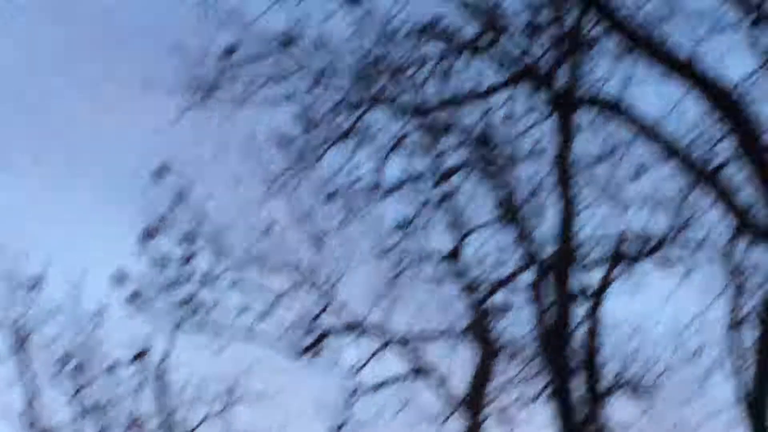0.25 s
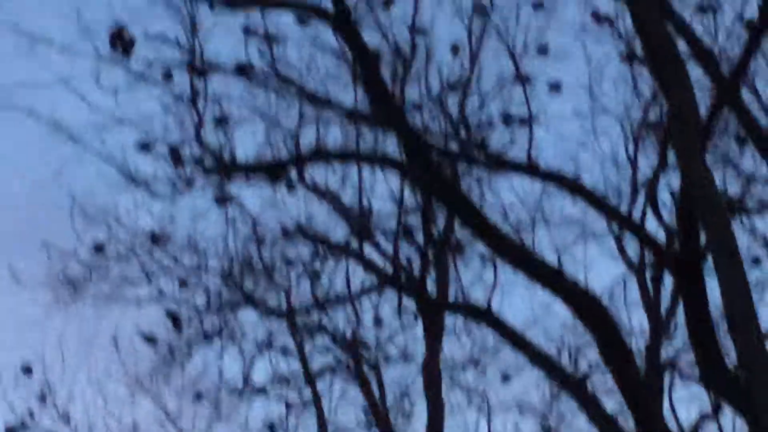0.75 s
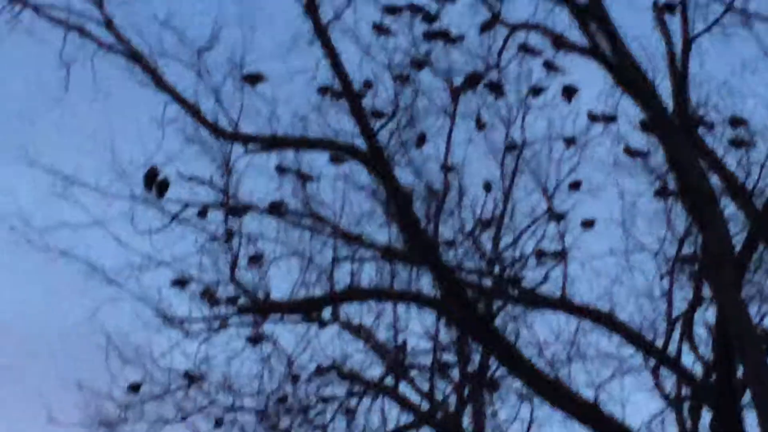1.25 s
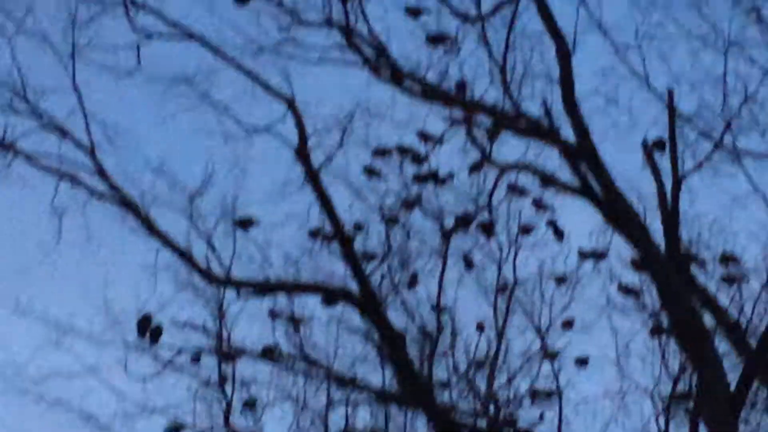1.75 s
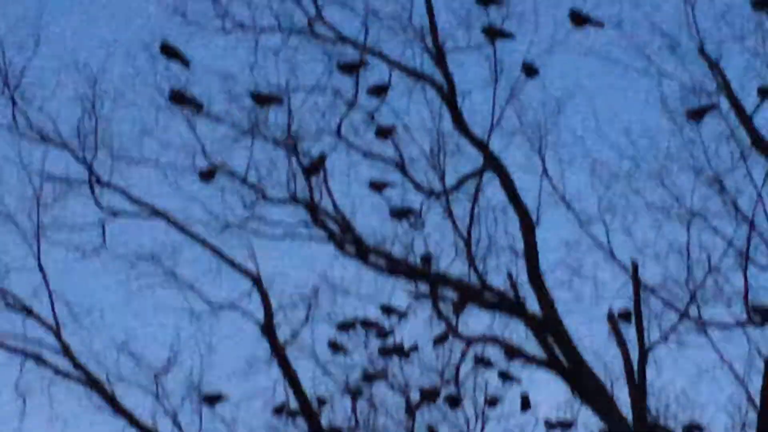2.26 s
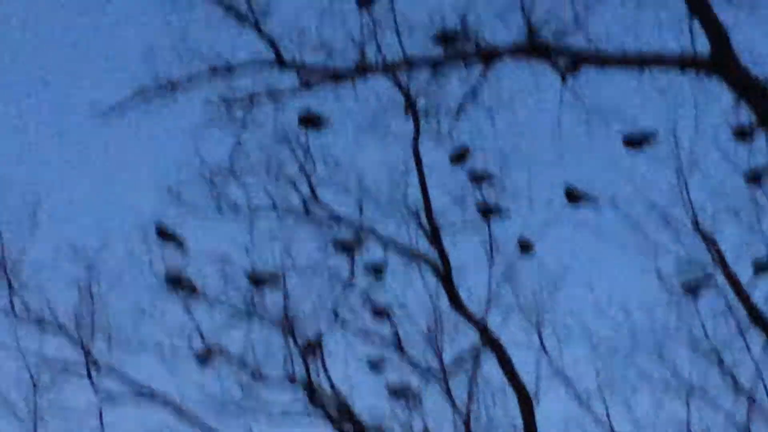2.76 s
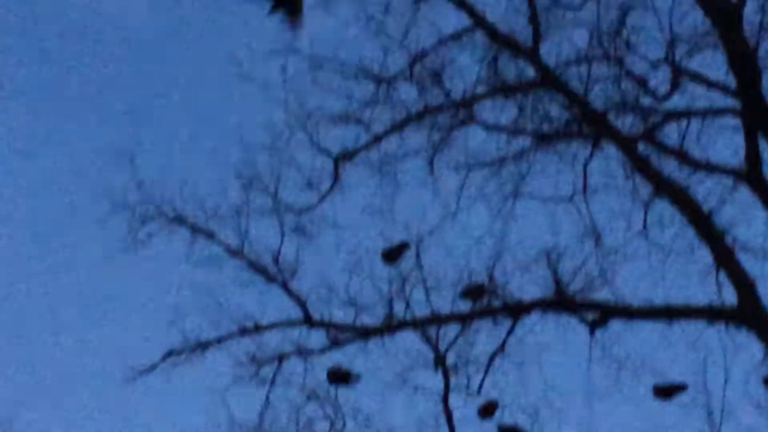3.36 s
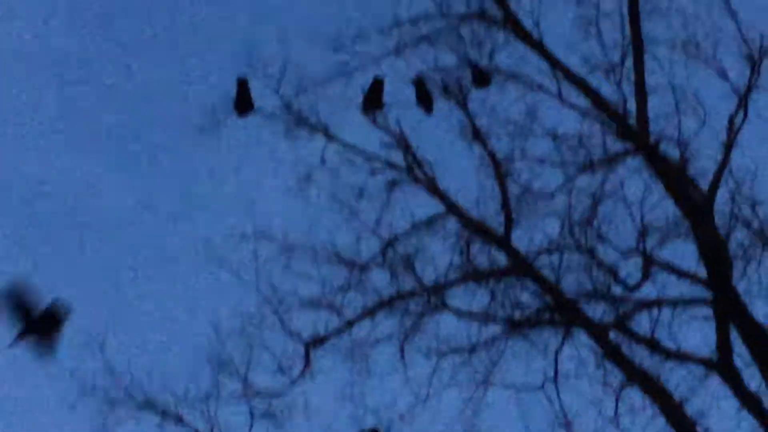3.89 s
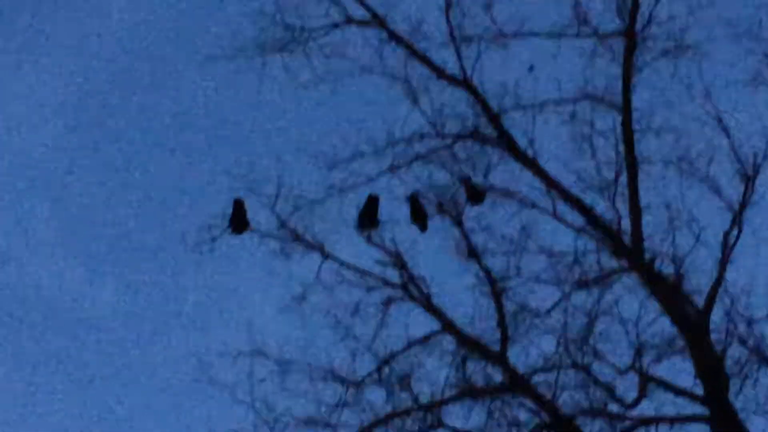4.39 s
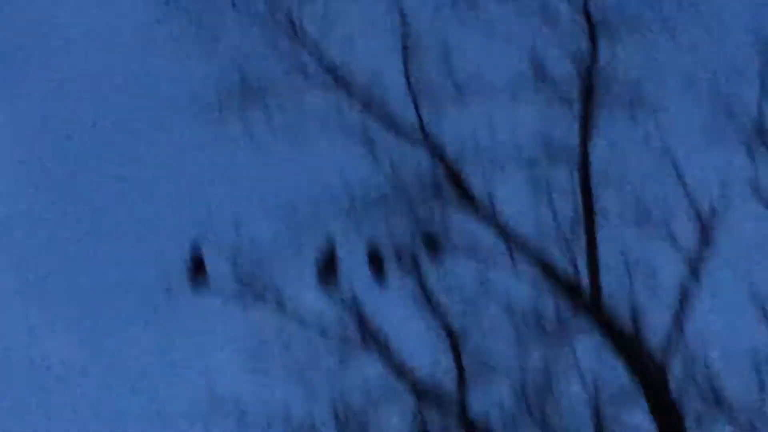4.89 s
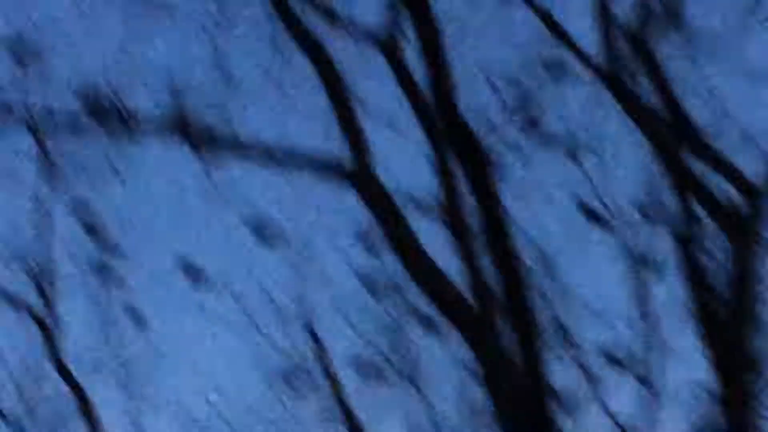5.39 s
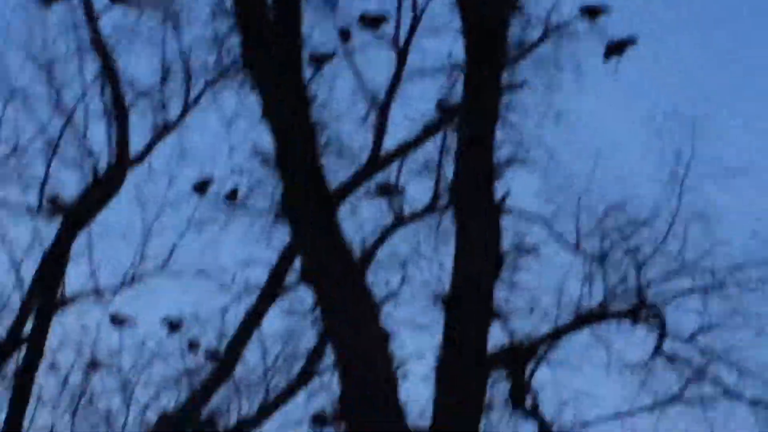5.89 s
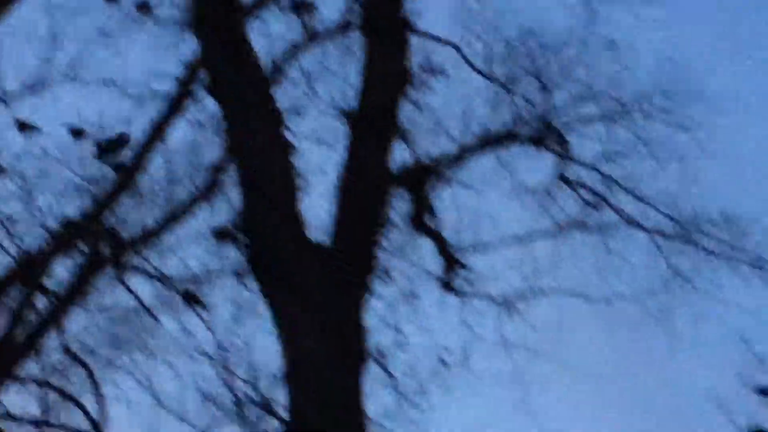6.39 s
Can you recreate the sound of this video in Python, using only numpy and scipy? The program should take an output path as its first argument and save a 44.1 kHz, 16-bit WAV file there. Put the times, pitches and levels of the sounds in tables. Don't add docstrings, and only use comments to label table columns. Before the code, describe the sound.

Crows caw hoarsely and repeatedly from bare trees at dusk, over a low engine-like rumble, with a burst of wind thumping the microphone.

```python
import sys
import numpy as np
from scipy import signal
from scipy.fft import rfft, irfft, next_fast_len
from scipy.io import wavfile
from scipy.ndimage import uniform_filter1d

SR = 44100
rng = np.random.default_rng(int(sys.argv[2]) if len(sys.argv) > 2 else 0)


def convert_level_to_amplitude(level_db):
    exponent = np.asarray(level_db, float) / 20
    return 10 ** exponent


def wav_out(sig):
    wavfile.write(sys.argv[1], SR, np.round(np.clip(np.atleast_2d(sig).T, -1, 1) * 32767).astype(np.int16))


N = 292912


def evened(x):
    return x / np.sqrt(np.mean(x ** 2) + 1e-20)


def curve(rows, t):
    s, *columns = np.transpose(rows)
    return [np.interp(t, s, c) for c in columns]


def add(mix, s, sound):
    part = mix[max(round(s * SR), 0):][:len(sound)]
    part += sound[:len(part)]


def drift(size, hz):
    knots = rng.standard_normal(400)
    at = np.arange(size) * hz * 2 / SR % 398
    whole = at.astype(int)
    blend = np.sin(np.pi / 2 * (at - whole)) ** 2
    return 1.15 * (knots[whole] + (knots[whole + 1] - knots[whole]) * blend)


def coloured(x, spectrum):
    hz, db = np.transpose(spectrum)
    size = next_fast_len(len(x), real=True)
    at = np.fft.rfftfreq(size, 1 / SR)
    gain = convert_level_to_amplitude(np.interp(np.log(at + 1), np.log(hz + 1), db))
    return evened(irfft(rfft(x, size) * gain, size)[:len(x)])


def rattle(size, hz, depth):
    turns = np.cumsum(hz * (1 + 0.31 * drift(size, 32.4))) / SR + rng.random()
    return 1 + np.clip(depth, 0, 1) * np.cos(2 * np.pi * turns)


def hoarse_caw(s, length, peak_db, fall_db):
    full_voice_db = -39
    t = np.arange(0, length, 1 / SR)
    onset_s, onset_db = min(0.032, length / 2), 17
    tone_db = peak_db - np.interp(t, [0, onset_s, length], [onset_db, 0, fall_db])
    wobble = .018 * (1 + .09 * np.maximum(full_voice_db - tone_db, 0))
    turns = np.cumsum(1272 * (1 + wobble * drift(len(t), 130))) / SR
    chop = .4 + .09 * (full_voice_db - peak_db)
    tone = evened(np.cos(2 * np.pi * turns) * rattle(len(t), 68.9, chop))
    return s, convert_level_to_amplitude(tone_db - 0.5) * tone * signal.windows.tukey(len(t), .15)


def hoarse_crow():
    # (time [s], length [s], peak level [dB], fall to the end [dB])
    syllables = [(0.591, 0.37, -46.5, 19), (1.12, 0.21, -44.5, 10.5), (1.651, 0.33, -48.5, 11),
                 (2.239, 0.25, -45, 8), (3.566, 0.14, -39.5, 6), (3.757, 0.12, -48.5, 5),
                 (4.069, 0.13, -40, 5), (4.23, 0.14, -47, 4), (4.495, 0.02, -43, 2),
                 (4.842, 0.064, -43.5, 3), (6.4, 0.021, -49, 7), (4.626, 0.13, -42, 1.5),
                 (4.796, 0.083, -49, 3), (4.93, 0.059, -40, -4), (5.017, 0.14, -48, 14),
                 (5.179, 0.31, -42, 7.5), (5.461, 0.086, -48.5, 11), (5.585, 0.082, -47.5, 9),
                 (5.668, 0.055, -45, 14), (5.815, 0.063, -44, 3), (5.906, 0.2, -51, 7),
                 (6.309, 0.12, -52.5, 9)]
    out = np.zeros(N)
    for row in syllables:
        add(out, *hoarse_caw(*row))
    return out


def rasp():
    # (time [s], length [s], level [dB])
    bursts = [(0.25, 0.023, -71.5), (0.605, 0.27, -71.5), (1.138, 0.19, -70.5), (1.687, 0.27, -75.5),
              (2.248, 0.3, -73), (3.585, 0.2, -68), (4.07, 0.39, -68), (4.62, 0.28, -70), (4.81, 0.26, -64),
              (5.207, 0.29, -64.5), (5.645, 0.24, -65.5), (5.852, 0.12, -69), (6.302, .12, -78),
              (6.517, .02, -80)]
    # (frequency [Hz], density [dB per Hz])
    breath_spectrum = [(1650, -43), (2900, 1), (3500, -3), (4300, -1.5), (5100, -3), (5900, -3), (6600, -7),
                       (7200, -12), (13000, -32.5)]
    rise_db_per_s, fall_db_per_s = 300, 44
    t, db = np.arange(N) / SR, -86.5
    for s, length, peak_db in bursts:
        away_db = np.maximum(rise_db_per_s * (s - t), fall_db_per_s * (t - s - length))
        swell_db = 2.5 * np.clip(2 * (t - s) / length - 1, -1, 1) ** 2
        db = np.maximum(db, peak_db - np.maximum(away_db, 0) - swell_db)
    turns = np.cumsum(619.4 * (1 + .012 * drift(N, 40) + .04 * drift(N, 3))) / SR
    overtones = sum(np.cos(2 * np.pi * k * turns + k * k) for k in range(4, 13))
    puffs = (1 + .5 * np.cos(2 * np.pi * turns)) * rng.standard_normal(N)
    rough = (puffs + .09 * overtones) * rattle(N, 68, .2) * convert_level_to_amplitude(1.5 * drift(N, 220))
    return convert_level_to_amplitude(db + 3.0 + 1.12 * drift(N, 22)) * coloured(rough, breath_spectrum)


def caw(row, throat, arch, jitter, chop, opening_db):
    s, length, middle_hz, glide_hz, db = row
    u = np.linspace(0, 1, round(length * SR))
    hz = middle_hz + glide_hz * (u - .5) - arch * length * (2 * u - 1) ** 2
    turns = np.cumsum(hz * (1 + jitter * drift(len(u), 145.56))) / SR
    beak = [1] + [convert_level_to_amplitude(opening_db * (u - .5))] * (len(throat) - 1)
    highest_hz = throat[-1][0] + 2 * throat[-1][1]
    voice = 0
    for k in range(1, round(highest_hz / middle_hz) + 1):
        gain = 0
        for b, (f, w, d) in zip(beak, throat):
            gain = gain + b * convert_level_to_amplitude(d) / (1 + (2 * (k * hz - f) / w) ** 2) ** 2
        voice = voice + gain * np.cos(2 * np.pi * k * turns)
    return s, convert_level_to_amplitude(db) * voice * rattle(len(u), 69.25, chop) * signal.windows.tukey(len(u), .4)


def bird(caws, throat, **voice):
    out = np.zeros(N)
    for row in caws:
        add(out, *caw(row, throat, **voice))
    return out


def clear_crows():
    # (time [s], length [s], middle pitch [Hz], glide from first to last [Hz], level [dB])
    short = [
        (2.62, .105, 775, 50, -46),
        (2.845, .095, 745, 40, -47),
        (3.08, .095, 750, -10, -46),
        (3.305, .085, 745, 30, -47.5),
        (3.553, .085, 755, 20, -49),
    ]
    swelling = [
        (4.8, .085, 745, 110, -45),
        (5.205, .09, 722, 150, -42),
        (5.68, .07, 725, 140, -43),
    ]
    rising = [
        (4.875, .05, 860, 70, -47),
        (4.915, .045, 780, -40, -45),
        (5.285, .075, 848, -35, -46),
        (5.63, .06, 770, 30, -53),
        (5.75, .065, 840, -45, -49),
    ]
    falling = [(.725, .13, 765, -150, -51), (1.255, .14, 775, -150, -49), (4.92, .04, 770, -40, -43),
               (1.795, .12, 775, -130, -48), (2.39, .14, 775, -110, -50), (2.05, .12, 860, -60, -54),
               (3.7, .2, 770, -30, -54), (4.16, .07, 855, -10, -51), (4.48, .12, 485, -10, -51),
               (5.345, .06, 780, -110, -49), (5.8, .07, 755, -90, -47), (5.99, .06, 722, -20, -49),
               (5.54, .1, 750, -50, -49)]
    dropping = [
        (5.375, .06, 625, -60, -40),
        (5.095, .06, 590, -110, -44),
        (5.83, .065, 595, -110, -40),
        (5.93, .08, 563, -50, -48),
        (5.0, .07, 575, 90, -52),
    ]
    # (centre [Hz], width [Hz], level [dB])
    short_throat = [(1345, 200, 5), (3720, 500, -24), (4400, 500, -28)]
    swelling_throat = [(1400, 600, 1), (3080, 320, -13), (3900, 250, -30)]
    rising_throat = [(1450, 480, 1), (2530, 200, -16), (3090, 220, -10), (3420, 280, -13), (4180, 350, -17),
                     (7750, 400, -38)]
    falling_throat = [(1450, 1000, 0), (2930, 200, -30)]
    dropping_throat = [(1190, 520, 0), (2930, 200, -32)]
    out = bird(short, short_throat, arch=950, jitter=.006, chop=.35, opening_db=24)
    out += bird(swelling, swelling_throat, arch=240, jitter=.003, chop=.3, opening_db=12)
    out += bird(rising, rising_throat, arch=240, jitter=.004, chop=.45, opening_db=0)
    out += bird(falling, falling_throat, arch=40, jitter=.009, chop=.6, opening_db=-6)
    out += bird(dropping, dropping_throat, arch=40, jitter=.005, chop=.4, opening_db=0)
    return out


def rough_crows():
    # (time [s], length [s], middle pitch [Hz], glide from first to last [Hz], level [dB])
    raw = [(2.555, .055, 715, 5, -68), (4.225, .13, 762, 10, -62.5), (4.515, .13, 765, 10, -63.5),
           (4.795, .085, 785, 5, -63), (4.915, .05, 770, 50, -61), (5.125, .04, 730, 0, -66),
           (5.348, .075, 750, 0, -58), (5.635, .03, 725, 30, -64), (5.69, .035, 735, -40, -62),
           (5.76, .055, 835, -50, -58), (5.995, .04, 810, -40, -66)]
    deep = [
        (.645, .11, 590, -12, -62),
        (1.17, .13, 590, -40, -62),
        (1.331, 0.066, 583, -13, -69),
        (1.655, .045, 568, 0, -66),
        (1.74, .06, 585, -15, -64),
        (1.81, .05, 590, 0, -68),
        (2.325, .12, 580, -75, -62),
    ]
    breathy = [
        (1.17, .13, 590, -45, -71),
        (1.69, .12, 595, -35, -72),
    ]
    low = [
        (4, 0.106, 650, -35, -53),
        (4.5, 0.055, 475, -24, -45),
        (5, 0.084, 540, -38, -50.5),
        (3.3, 0.09, 540, -28, -52),
        (4.222, 0.055, 490, 43, -49),
        (5.3, 0.064, 400, -20, -47),
        (5.02, .05, 545, 39, -50),
    ]
    # (centre [Hz], width [Hz], level [dB])
    raw_throat = [(3750, 700, 0), (1500, 300, -6), (4500, 300, -22)]
    deep_throat = [(2910, 420, -1), (1234, 250, 8.5), (4130, 450, -11)]
    breathy_throat = [(4130, 500, 0)]
    low_throat = [(950, 510, -1), (1920, 320, -16)]
    out = bird(raw, raw_throat, arch=520, jitter=.007, chop=.7, opening_db=3)
    out += bird(deep, deep_throat, arch=40, jitter=.013, chop=.8, opening_db=0)
    out += bird(breathy, breathy_throat, arch=40, jitter=.028, chop=.9, opening_db=0)
    out += bird(low, low_throat, arch=40, jitter=0.018, chop=1.0, opening_db=0)
    return out


def trees(x, t60, gap_s):
    at = np.arange(0, SR // 2, 22) + rng.integers(0, 22, SR // 44 + 1)
    taps = np.zeros(SR)
    taps[at + round(gap_s * SR)] = rng.choice([-1., 1.], len(at)) * convert_level_to_amplitude(-60 * at / SR / t60)
    return signal.fftconvolve(x, taps / np.linalg.norm(taps))[:N]


def far_flock():
    # (time [s], level [dB])
    flock_levels = [(0.0, -80), (0.4, -68), (0.76, -53), (1.0, -70), (1.37, -59), (1.6, -64.5), (2.39, -53),
                    (2.88, -66), (3.79, -53.5), (4.05, -55.5), (4.3, -48), (4.5, -51), (4.9, -48),
                    (5.1, -51.5), (5.35, -50.5), (5.75, -51.5), (6.1, -60), (6.64, -68)]
    # (centre [Hz], width [Hz], level [dB])
    flock_throat = [(1340, 970, 0), (1770, 1560, -6.5)]
    flock = np.zeros(N)
    for when, long, high, loud in rng.random((90, 4)):
        hz = 560 + 260 * high
        row = (when * N / SR - .1, .15 + .2 * long, hz, -.05 * hz, -9 * loud)
        add(flock, *caw(row, flock_throat, arch=240, jitter=0.04156, chop=0.46, opening_db=0))
    flock = flock * convert_level_to_amplitude(-3.5) + trees(flock, t60=0.86, gap_s=.01)
    flock /= np.sqrt(uniform_filter1d(flock ** 2, size=12000)) + 1e-9
    far_db, = curve(flock_levels, np.arange(N) / SR)
    return convert_level_to_amplitude(far_db + 1.5) * flock


def crows():
    near = hoarse_crow() + rasp() + clear_crows() + rough_crows()
    return near + convert_level_to_amplitude(-12) * trees(near, t60=0.31, gap_s=0.013) + far_flock()


def wind():
    # (time [s], level [dB])
    gust = [
        (3.85, -48),
        (4.038, -43),
        (4.2, -49),
        (4.298, -42),
        (4.668, -57),
        (4.838, -42),
        (5.008, -37),
        (5.146, -45),
        (5.3, -68),
    ]
    # (frequency [Hz], density [dB per Hz])
    gust_spectrum = [(18, -39), (30, -32), (64, -7), (112, 3), (195, -1), (317, -17), (441, -18.5),
                     (700, -36), (910, -70), (1540, -120)]
    # (time [s], peak level [dB], frequency [Hz], length [s])
    thumps = [(0.036, -41, 259, 0.085), (3.2, -38, 200, 0.12), (2.72, -38, 190, .12),
              (3.68, -41, 201, 0.11), (1.66, -37.5, 149.5, 0.12), (.97, -41.5, 271.6, 0.054),
              (3.95, -38.5, 207, 0.064), (5.87, -33.5, 150, 0.097), (6.02, -37, 168.5, 0.075),
              (4.52, -27, 151, 0.047), (2.509, -30, 62.3, 0.035), (3.929, -31, 136, 0.031),
              (4.027, -19.5, 93.4, 0.027), (4.106, -22, 61.9, 0.019), (4.168, -23, 87, 0.042),
              (4.236, -34, 139, 0.047), (4.28, -20.5, 134, 0.038), (4.336, -23, 103, 0.036),
              (4.382, -18.5, 82, 0.049), (4.394, -20, 150, 0.031), (4.512, -28, 97, 0.033),
              (4.599, -26, 62, 0.031), (4.659, -28, 177, 0.041), (4.746, -47, 64.6, 0.032),
              (4.798, -23.5, 97.3, 0.062), (4.861, -26, 135, 0.019), (4.908, -21.5, 115, 0.029),
              (4.935, -20, 174.5, 0.039), (4.96, -17.5, 92.5, 0.037), (5.007, -21.5, 71.5, 0.036),
              (5.073, -30, 96, 0.043), (5.105, -29, 97, 0.041), (5.158, -24, 74, 0.036)]
    # (time [s], peak level [dB], centre [Hz])
    pops = [(4.037, -35.5, 240), (4.113, -36, 270), (4.189, -33.5, 278), (4.298, -34, 220),
            (4.356, -42, 270), (4.393, -28, 277), (4.52, -33, 190), (4.545, -38, 212), (4.688, -31.5, 185),
            (4.8, -37, 230), (4.815, -37, 220), (4.86, -37, 199), (4.945, -22.5, 211), (4.956, -26.5, 292),
            (4.967, -31.5, 272), (5.014, -29.5, 201), (5.045, -39, 210), (5.086, -24.5, 295),
            (5.138, -38, 280), (5.172, -42, 219)]
    t = np.arange(N) / SR
    lumps = coloured(rng.standard_normal(N) * convert_level_to_amplitude(3. * drift(N, 25)), gust_spectrum)
    first_s, last_s = gust[0][0], gust[-1][0]
    fade = np.interp(t, [first_s, first_s + 0.13, last_s - .1, last_s], [0, 1, 1, 0])
    out = convert_level_to_amplitude(curve(gust, t)[0] + 1.0) * lumps * fade
    for (s, db, hz, length), start in zip(thumps, rng.random(len(thumps))):
        u = np.arange(round(length * SR)) / SR
        swell = np.sin(np.pi * u / length) ** 2
        add(out, s - .006, convert_level_to_amplitude(db - 5.5) * swell * np.cos(2 * np.pi * (hz * u + start)))
    for s, db, hz in pops:
        u = (np.arange(1200) / SR - .0055) * np.pi * hz
        add(out, s, -convert_level_to_amplitude(db + 2.0) * (1 - 2 * u ** 2) * np.exp(-u ** 2))
    return out


def engine():
    # (time [s], level [dB])
    engine_levels = [(0.0, -67), (0.24, -45), (0.9, -42), (1.74, -43.5), (2.09, -59), (2.39, -56),
                     (2.5, -41.5), (2.87, -46.5), (3.03, -65), (3.16, -43), (3.44, -70), (3.73, -37),
                     (3.87, -49.5), (4.3, -48.5), (5.0, -53), (5.58, -51.5), (5.68, -42), (6.64, -45)]
    # (multiple of the firing rate [1], level [dB])
    orders = [(1, -27), (2, 2.5), (3, 1.5), (4, -5.5), (5, -7.5), (6, -8), (7, -11.5), (8, -19), (9, -5.5),
              (10, -15), (11, -23), (12, -26)]
    slow = 16
    t = np.arange(0, N, slow) / SR
    turns = np.cumsum(22.61 * (1 + 0.0032 * drift(len(t), 19.04))) * slow / SR
    level_db, = curve(engine_levels, t)
    swell_db = level_db - level_db.mean()
    hum, shared_db = 0, 1.2 * drift(len(t), 20)
    for k, db in orders:
        steady_db = db - np.clip(0.14 * k - .3, 0, 1) * swell_db
        gain = convert_level_to_amplitude(steady_db + shared_db + 2. * drift(len(t), 40))
        hum = hum + gain * np.cos(k * (2 * np.pi * turns + .04 * k))
    puffs = rng.standard_normal(len(t)) * (1 + 0.4 * np.cos(2 * np.pi * turns))
    rumble = signal.lfilter(*signal.butter(2, [75, 150], "band", fs=SR / slow), puffs)
    hum = convert_level_to_amplitude(level_db + 2.5) * (evened(hum) + convert_level_to_amplitude(-12) * evened(rumble))
    return signal.resample_poly(hum, up=slow, down=1)[:N]


def camera():
    # (time [s], peak level [dB], part [0 button, 1 shell, 2 grip])
    ticks = [(0.2329, -59, 0), (0.2733, -51, 1), (0.2844, -58, 1), (0.4, -63, 0), (0.9862, -53, 0),
             (1.4272, -60, 0), (1.8632, -53, 0), (1.9394, -63, 0), (2.1594, -58, 0), (3.0081, -60, 1),
             (3.4835, -48, 1), (4.0901, -46, 1), (4.6633, -34, 2), (4.8479, -42, 2), (5.0759, -42, 2),
             (5.3887, -44, 0), (5.8955, -57, 0), (5.9044, -49, 2), (6.3624, -63, 0), (6.5206, -48, 0),
             (3.484, -59, 0), (4.6623, -59, 0), (4.498, -45, 2), (4.931, -44, 2), (6.404, -48, 2),
             (6.5216, -44, 1), (6.527, -44, 1)]
    # (centre [Hz], ring t60 [s])
    parts = [
        (10000, 0.006),
        (5500, 0.006),
        (1800, 0.009),
    ]
    out, t = np.zeros(N), np.arange(600) / SR
    for (s, db, part), grit in zip(ticks, rng.choice([-1., 1.], (len(ticks), 600))):
        hz, t60 = parts[round(part)]
        band = signal.butter(3, [0.6 * hz, min(1.45 * hz, 20000)], "band", fs=SR)
        add(out, s, convert_level_to_amplitude(db - .8) * signal.lfilter(*band, grit * convert_level_to_amplitude(-60 * t / t60)))
    return out


def rustle():
    # (time [s], level [dB])
    brushes = [
        (.28, -82),
        (.75, -87),
        (1.45, -86),
        (3.7, -72),
        (3.88, -74),
        (4.66, -77),
        (4.9, -83),
        (5.27, -72),
        (5.9, -81),
        (6.52, -89),
    ]
    hiss = signal.sosfilt(signal.butter(2, 7500, "high", fs=SR, output="sos"), rng.standard_normal(N))
    t = np.arange(N) / SR
    strokes = sum(convert_level_to_amplitude(db) * np.exp(-((t - s) / 0.024) ** 2) for s, db in brushes)
    return (convert_level_to_amplitude(-82.5 + 2.2 * drift(N, 13)) + strokes) * hiss


def air():
    # (frequency [Hz], density [dB per Hz])
    air_spectrum = [(18, -30), (30, 2), (59, -2.5), (201, -2.5), (298, -15), (489, -20), (891, -16),
                    (1070, -16.5), (1320, -17), (2050, -21.5), (2810, -36.5), (4370, -40.5), (7770, -51),
                    (14100, -56), (15300, -58)]
    hum = coloured(rng.standard_normal(N), air_spectrum)
    return convert_level_to_amplitude(-56.5 + 11.5 + 0.95 * drift(N, 6)) * hum


def scene():
    return (crows() + wind() + engine() + camera() + rustle() + air())[None]


def roll_off(x):
    return signal.sosfilt(signal.butter(12, 15780, fs=SR, output="sos"), x)


def record(dry):
    limit_db, squeeze, recover_db_per_s = -29.5, 0.65, 45
    cut = signal.sosfilt(signal.butter(6, 39, "high", fs=SR, output="sos"), dry)
    cut = signal.oaconvolve(cut, signal.firwin(511, 15330, fs=SR)[None], "same")
    power = uniform_filter1d(cut[0] ** 2, size=800, origin=399)
    power_db = 10 * np.log10(abs(power) + 1e-12)
    fall = np.arange(N) * recover_db_per_s / SR
    held_db = np.maximum.accumulate(power_db + fall) - fall
    over_db = np.maximum(held_db - limit_db, 0)
    mix = cut / convert_level_to_amplitude(squeeze * uniform_filter1d(over_db, size=400))
    return roll_off(mix)


dry = scene()
out = record(dry)
wav_out(out)
```